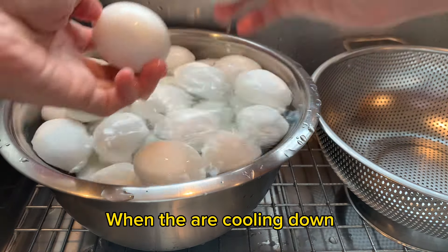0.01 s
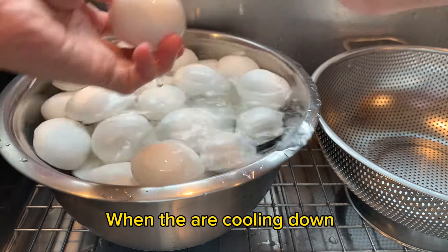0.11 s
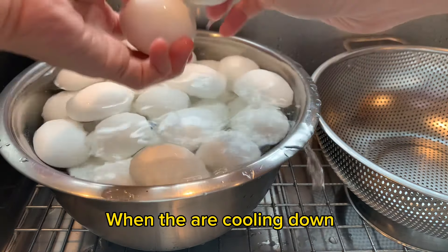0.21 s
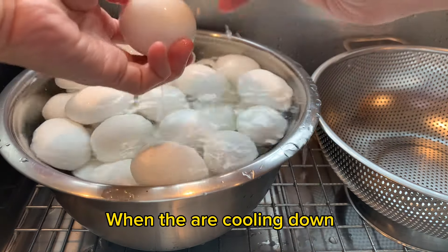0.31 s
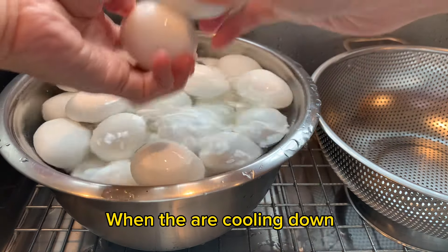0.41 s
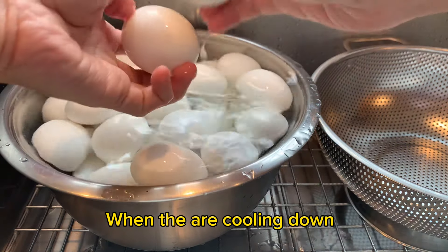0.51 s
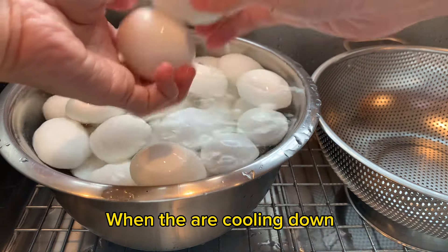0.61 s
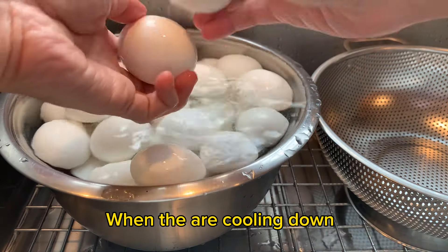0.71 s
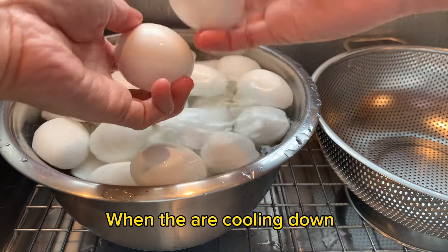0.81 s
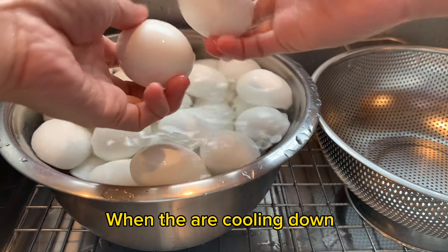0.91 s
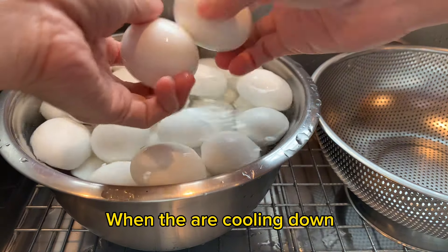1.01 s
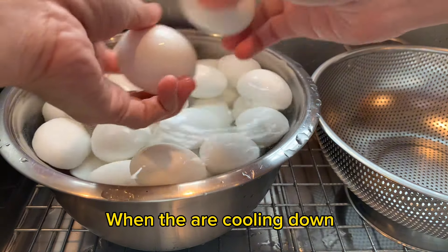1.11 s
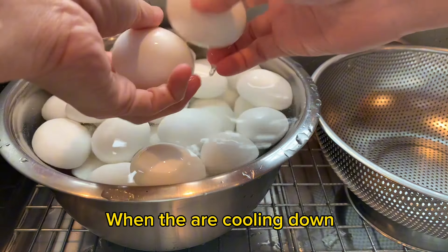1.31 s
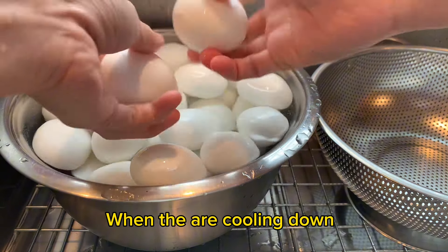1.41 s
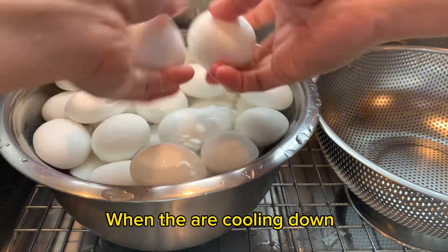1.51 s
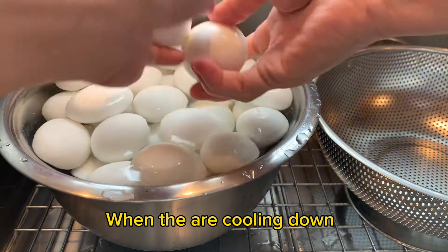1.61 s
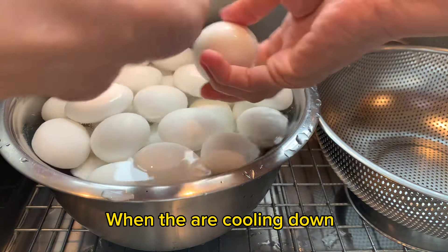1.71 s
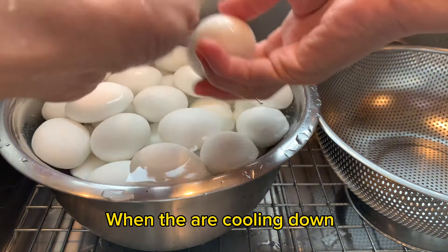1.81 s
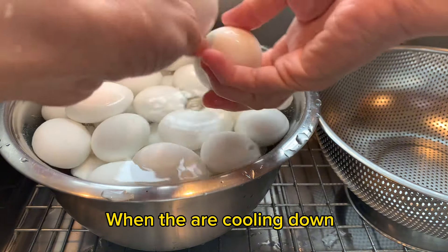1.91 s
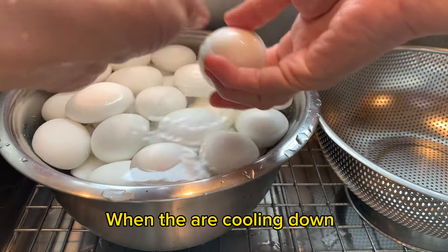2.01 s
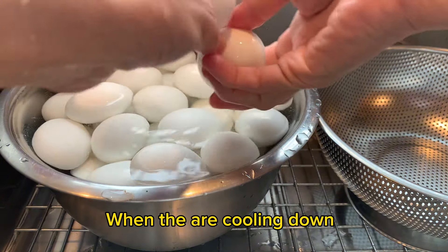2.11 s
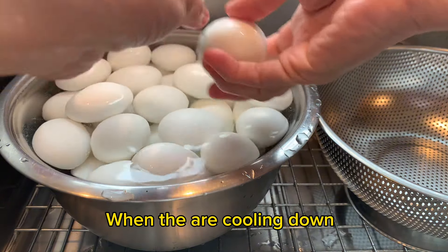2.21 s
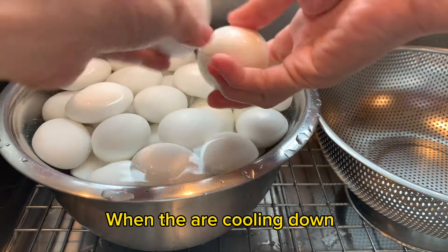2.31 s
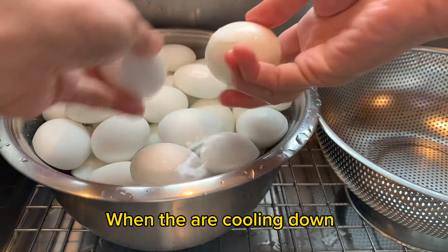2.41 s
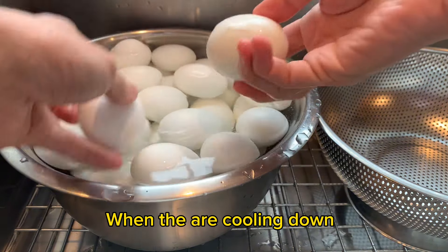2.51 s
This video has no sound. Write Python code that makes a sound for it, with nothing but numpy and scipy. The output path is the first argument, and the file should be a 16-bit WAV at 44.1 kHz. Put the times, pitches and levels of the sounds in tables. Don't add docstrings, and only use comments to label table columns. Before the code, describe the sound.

Boiled eggs knock together over a water-filled steel bowl in a sink: about ten crisp shell cracks, loud and faint, with tiny flake ticks, soft water bumps early on, short kitchen echo, close phone microphone.

```python
import sys
import numpy as np
from scipy import signal
from scipy.fft import rfft, irfft
from scipy.io import wavfile
from scipy.ndimage import uniform_filter1d

SR = 44100
rng = np.random.default_rng(int(sys.argv[2]) if len(sys.argv) > 2 else 0)


def generate_wav(sig):
    pcm = np.round(np.clip(np.atleast_2d(sig).T, -1, 1) * 32767).astype(np.int16)
    wavfile.write(sys.argv[1], SR, pcm)


def elevation(decibels):
    levels = np.asarray(decibels, float)
    return 10 ** (levels / 20)


N = 112455

# (time [s], peak level [dB], rise [ms], burst length [ms], brightness [dB per octave])
KNOCKS = [
    (0.2014, -4, 0.18, 5.3, -2),
    (0.4299, -11.5, 0.11, 7.3, -2.8),
    (.63, -11.5, 0.63, 6.3, -2.8),
    (1.038, -23, 0.46, 2.83, -1.4),
    (1.2516, -9.5, 0.75, 1.5, 1),
    (1.5914, -29.5, 0.84, 1.98, -5.5),
    (1.8587, -16, 3.2, 3.2, 3),
    (2.0837, -5, 0.59, 3.07, 3),
    (2.279, -17, 0.66, 4.8, 6.5),
    (2.5335, -32.5, 0.16, 2.8, 8),
]
CREAK_MS = 5


def at(table, hz):
    t = np.array(table, float)
    return np.interp(np.log(hz + 1), np.log(t[:, 0]), t[:, 1])


def unit(x):
    return x / np.sqrt(np.mean(x ** 2))


def colour(x, table):
    cepstrum = irfft(at(table, np.linspace(0, SR / 2, 513)) * np.log(10) / 20)
    cepstrum[1:512] *= 2
    cepstrum[513:] = 0
    response = irfft(np.exp(rfft(cepstrum)))
    return signal.fftconvolve(x, response[None], axes=-1)[..., :x.shape[-1]]


def ring(hz, t60, count=2048):
    t = np.arange(count) / SR
    return np.sin(2 * np.pi * hz * t) * elevation(-60 * t / t60)


def walk(rate):
    k = int(SR / rate)
    steps = np.repeat(rng.standard_normal(N // k + 1), k)
    return 1.6 * uniform_filter1d(uniform_filter1d(steps, k), k)[:N]


def dull(x):
    echo_top_hz = 14500
    return signal.sosfilt(signal.ellip(6, .5, 40, echo_top_hz, fs=SR, output="sos"), x)


def firm(x):
    floor_hz = 780
    return signal.sosfilt(signal.butter(4, floor_hz, "high", fs=SR, output="sos"), x)


def add(track, s, x):
    i = int(s * SR)
    track[..., i:i + x.shape[-1]] += x[..., :N - i]


def fractures(rise_ms, ms, tilt_db, chance):
    # (frequency [Hz], level [dB])
    shell = [(500, -33), (3200, -19.5), (4900, -0.3), (6200, -6), (8300, -1), (11500, 4), (13500, 4.5),
             (16000, -10)]
    # (frequency [Hz], level [dB], t60 [s])
    shell_modes = [(4900, -8, .005), (6560, -8, .005), (10200, -8, .004), (13600, -8, .003)]
    fractures_per_s, size_spread_db = 18000, 3.2
    creak_db, creak_growth_ms = -20, 1.1
    crest = 2.6

    t = np.arange(chance.shape[1]) / SR * 1000 - CREAK_MS
    creak = elevation(creak_db) * np.exp(-np.abs(t) / creak_growth_ms)
    t = np.maximum(t, 0)
    shape = creak + (1 - np.exp(-t / rise_ms)) ** 2 * np.exp(-(t / ms) ** 1.1)

    happens = chance[0] < fractures_per_s / SR
    direction = np.sign(chance[1] - .5)
    size = elevation(-size_spread_db * np.log(chance[2]))
    clicks = shape * happens * direction * size

    body = np.zeros(2048)
    for (hz, db, t60), c in zip(shell_modes, chance[1]):
        body += elevation(db) * .3 * ring(hz * (.94 + .12 * c), t60)
    body[0] += 1
    cracking = signal.fftconvolve(clicks, body)[:len(t)]
    even = 1. * (np.arange(len(t)) == np.argmax(shape))

    tilted = [(hz, db + tilt_db * np.log2(hz / 4000)) for hz, db in shell]
    cracking, even = colour(np.array([cracking, even]), tilted)
    even = even * cracking.std() / even.std()
    rms = np.sqrt(np.sum(cracking ** 2) / np.sum((shape / shape.max()) ** 2))
    return np.array([cracking, even]) / (crest * rms)


def cracks():
    # (level at 2.4 kHz [dB], at 5 kHz [dB], at 11.5 kHz [dB], at 15.5 kHz [dB], echo [dB])
    tones = [(-0.5, -1.5, -6, -4.5, 7), (6.5, -4.5, -1.5, 6, 1), (3.5, -5.5, 1.5, -1, -1),
             (9.5, -2.5, 0, 2, 10), (8.5, -3, -4, 2.5, 4.5), (5.5, -7.5, -0.5, 6, 9),
             (15.5, -4, -5.5, -1, 7.5), (4.5, -5.5, -6, -2.5, -2.5), (7, -6.5, -3.5, -5, 7),
             (11, 4, 14, 5.5, -5)]
    tone_hz = 2400, 5000, 11500, 15500
    # (time [s], level [dB], burst length [ms], brightness [dB per octave])
    flakes = [(.008, -48, 6., -11), (0.031, -38.5, 4.2, -14.5), (0.139, -47.5, 9.2, -13),
              (.158, -42.5, 7, -14.5), (0.1962, -30.5, 0.55, -12), (0.3461, -26.5, 3.6, 4.5),
              (0.397, -38.5, 6.1, -5), (1.653, -48, 1.5, 6), (1.664, -45, 3.06, -11), (1.6935, -42, 2.6, 2),
              (1.702, -42, 2.1, 5), (1.7074, -49, 3., -6.5), (2.3101, -41, 2.3, -11),
              (2.47, -47.5, 1.4, 12)]
    flake_rise_ms = .8

    out = np.zeros((2, N))
    chances = rng.random((len(KNOCKS), 3, 2048))
    for (s, db, *form), (*tone_db, echo_db), chance in zip(KNOCKS, tones, chances):
        low = list(zip(tone_hz[:2], tone_db[:2]))
        high = list(zip(tone_hz[2:], tone_db[2:]))
        tone = [(tone_hz[0] / 2, 0), *low, (8000, 0), *high]
        burst = colour(fractures(*form, chance), tone)
        add(out, s - CREAK_MS / 1000, elevation(db) * burst * elevation(np.array([[0], [echo_db]])))
    for (s, db, *form), chance in zip(flakes, rng.random((len(flakes), 3, 2048))):
        add(out, s - CREAK_MS / 1000, elevation(db) * fractures(flake_rise_ms, *form, chance))
    return firm(out)


def eggs():
    # (low pitch [Hz], level [dB], high pitch [Hz], level [dB])
    egg_notes = [(1280, -61.5, 1800, -25), (1067, -36.5, 1560, -35), (1050, -64, 1620, -28),
                 (1110, -42, 1940, -40.5), (1126, -29, 1390, -32), (1013, -51, 1530, -48.5),
                 (945, -29.5, 1600, -28), (1060, -23, 1650, -26.5), (1053, -26.5, 1100, -35),
                 (1100, -63, 1200, -54)]
    note_late_s, note_rise_ms, contact_ms = .0004, .8, 2.5

    thud = elevation(-6) * ring(2250, .012)
    broad_knock = elevation(-4) * ring(1460, .012)
    out = np.zeros(N)
    t = np.arange(256) / SR * 1000
    roughness = rng.standard_normal((len(egg_notes), len(t)))
    for knock, (hz, db, high_hz, high_db), rough in zip(KNOCKS, egg_notes, roughness):
        low = elevation(db) * ring(hz, .018)
        high = elevation(high_db) * (ring(high_hz, .013) + thud + broad_knock)
        body = low + high
        body *= 1 - np.exp(-np.arange(len(body)) / SR * 1000 / note_rise_ms)
        push = rough * np.exp(-t / contact_ms) * 0.27
        push[0] += 1
        add(out, knock[0] + note_late_s, signal.fftconvolve(body, push))
    return firm(out)


def pair(likeness, count):
    alike_from_hz, alike_by_hz, treble_likeness = 6000, 11000, .96
    hz = np.linspace(0, SR / 2, count // 2 + 1)
    shared = np.interp(hz, [alike_from_hz, alike_by_hz], [likeness, treble_likeness])
    n = rfft(rng.standard_normal((3, count)))
    return irfft(np.sqrt(shared) * n[0] + np.sqrt(1 - shared) * n[1:], count)


def kitchen():
    # (frequency [Hz], t60 [s])
    room_t60 = [(300, 0.63), (1500, 1), (5000, 0.6), (10000, 0.42), (14300, 0.3), (16500, 0.3)]
    sink_t60_s, sink_db, sink_likeness = .04, -26, .4
    counter_t60_s, counter_db, counter_likeness = .11, -30, .45
    room_db, room_rise_ms, room_likeness = -44, 0.57, .3

    t = np.arange(SR) / SR
    sink = pair(sink_likeness, SR) * elevation(sink_db - 60 * t / sink_t60_s) * np.minimum(t / 0.0007, 1)
    counter = pair(counter_likeness, SR) * elevation(counter_db - 60 * t / counter_t60_s)
    f, frames, z = signal.stft(pair(room_likeness, SR), SR, nperseg=256)
    fade = elevation(-60 * frames / at(room_t60, f)[:, None])
    room = signal.istft(z * fade, SR)[1][:, :SR]
    rise = 1 - np.exp(-t * 1000 / room_rise_ms)
    return dull(sink + (counter + elevation(room_db) * room) * rise)


def heard(direct, spread, echoes, late_s):
    x = direct + signal.fftconvolve(spread[None], echoes, axes=-1)[:, :N]
    left = np.pad(x[0], (int(round(late_s * SR)), 0))[:N]
    return np.array([left, x[1]])


def plops():
    # (time [s], pitch [Hz], level [dB], length [ms], glide [share of pitch])
    bumps = [(.025, 88, -44, 60, -0.038), (0.082, 104, -40.5, 24, -.2), (0.017, 210, -53, 40, .1),
             (.012, 444, -49, 26, 0.11), (.14, 134, -47, 50, 0), (0.181, 340, -61, 43, 0.2),
             (0.27, 68, -51, 210, -0.14), (0.38, 128, -44.5, 55, -0.029), (0.428, 82, -43.5, 21, -0.022),
             (0.45, 547, -48, 12, -0.022), (1.864, 330, -53, 12, 0), (2.102, 77, -45.5, 20, 0),
             (2.286, 330, -60, 15, 0), (0.046, 332, -56, 46, 0.13), (0.038, 500, -57.5, 74, 0.12),
             (0.21, 420, -66, 43, 0), (2.509, 132, -56.5, 34, 0)]
    # (time [s], pitch [Hz], level [dB], length [ms], glide [share of pitch])
    drips = [
        (1.292, 1150, -66, 18, .02),
        (2.104, 1000, -59, 12, -.04),
        (2.128, 1150, -59, 22, .03),
        (2.298, 1010, -57, 14, 0),
        (2.324, 1120, -62, 16, .04),
    ]
    t = np.arange(N) / SR
    out = np.zeros(N)
    for s, hz, db, ms, glide in bumps + drips:
        swell = np.exp(-(2000 * (t - s) / ms) ** 2)
        bend = 1 + glide * np.clip(500 * (t - s) / ms, -1, 1)
        out += elevation(db) * swell * np.sin(2 * np.pi * hz * (t - s) * bend)
    return out


def wide(table, hz):
    n = rng.standard_normal((2, N))
    side = signal.sosfilt(signal.butter(1, hz, "high", fs=SR, output="sos"), n[1])
    return unit(dull(colour(np.array([n[0] + side, n[0] - side]), table)))


def rumble():
    # (frequency [Hz], level [dB per Hz])
    rumble_tone = [(35, -12.5), (70, 2), (130, 0.5), (250, -0.5), (520, -8.5), (750, -16.5), (3500, -23.5),
                   (7000, -80.5)]
    # (time [s], level [dB])
    shifting = [
        (0, -47),
        (.08, -57.5),
        (.11, -53),
        (.19, -51.5),
        (.3, -65.5),
        (.38, -61),
        (.46, -63),
        (.68, -61),
        (0.762, -83.5),
    ]
    lumps_db = 3
    s, db = np.array(shifting).T
    level = np.interp(np.arange(N) / SR, s, db, right=-90)
    return elevation(level + lumps_db * walk(40)) * wide(rumble_tone, 640.0)


def fridge():
    # (pitch [Hz], level [dB], width [Hz])
    hum = [(58, -54.5, 4.3), (130.4, -61, 3.3), (90, -80, 48), (539, -70, 7.1), (434, -74.5, 24)]
    out = np.zeros(N)
    for hz, db, width_hz in hum:
        level = elevation(db - 1 + 1.9 * walk(16))
        out += level * np.sin(2 * np.pi * np.cumsum(hz + 0.72 * width_hz * walk(36)) / SR)
    return out


def hiss():
    # (frequency [Hz], level [dB per Hz])
    hiss_tone = [(30, -33), (60, 11.5), (200, -7.5), (500, -8), (800, -14.5), (2000, -17.5), (3200, -35.5),
                 (14000, -32.5)]
    hiss_db, wide_hz = -61.5, 463
    return elevation(hiss_db + 1.4 * walk(4.6)) * wide(hiss_tone, wide_hz)


def scene():
    echoes = kitchen()
    shell_late_s, note_late_s, note_echo_db = 13 / SR, 5 / SR, -12
    direct, spread = cracks()
    shells = heard(direct, spread, echoes, shell_late_s)
    dull_notes = eggs()
    bodies = heard(dull_notes, elevation(note_echo_db) * dull_notes, echoes, note_late_s)
    return shells + bodies + plops() + rumble() + fridge() + hiss()


def band_limit(x):
    return signal.sosfilt(signal.butter(12, 17140, fs=SR, output="sos"), x)


def record(dry):
    notch_hz, notch_width_hz, top_hz = 11900, 900, 15900
    x = signal.lfilter(*signal.iirnotch(notch_hz, notch_hz / notch_width_hz, SR), dry)
    x = .75 * np.tanh(x / .75)
    x = signal.sosfilt(signal.ellip(8, .5, 80, top_hz, fs=SR, output="sos"), x)
    return band_limit(x)


dry = scene()
out = record(dry)
generate_wav(out)
```